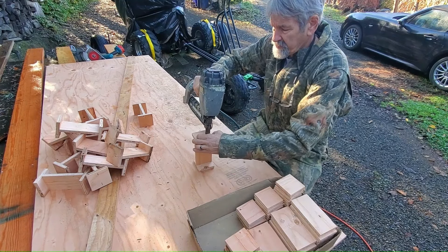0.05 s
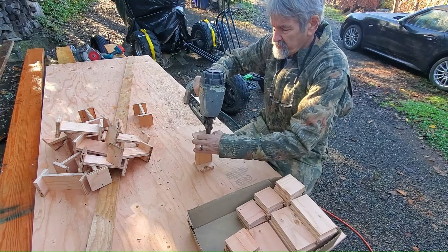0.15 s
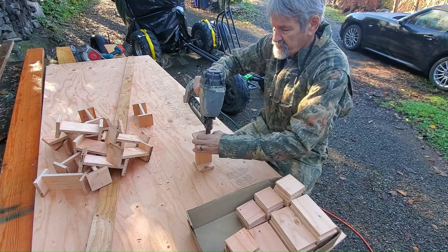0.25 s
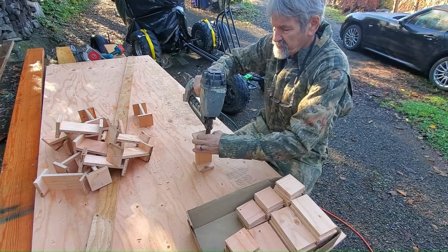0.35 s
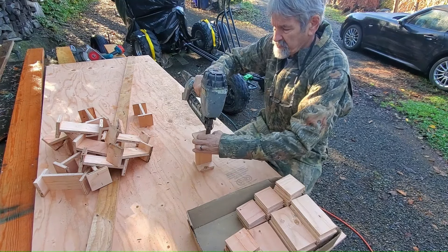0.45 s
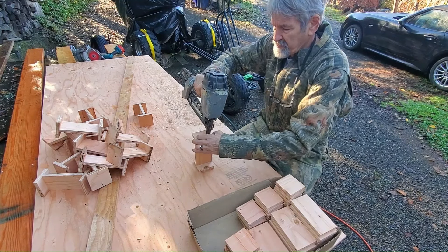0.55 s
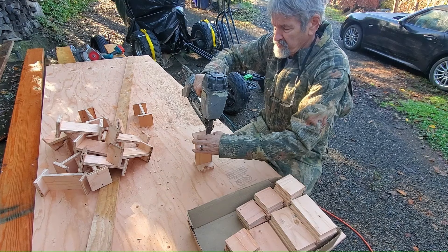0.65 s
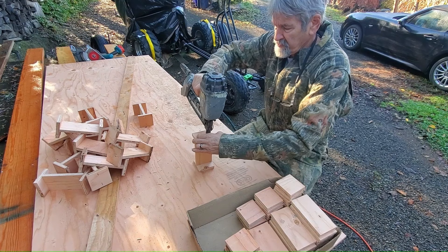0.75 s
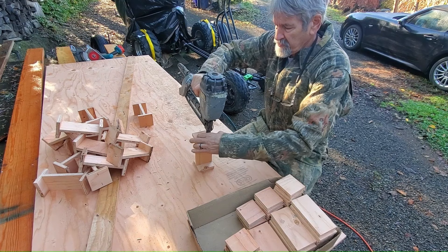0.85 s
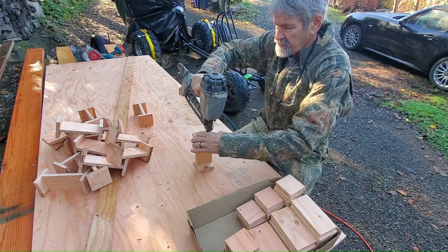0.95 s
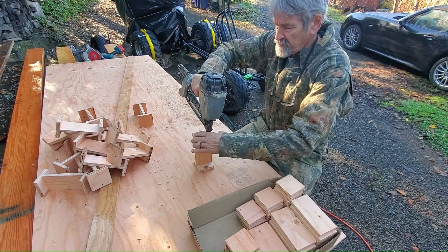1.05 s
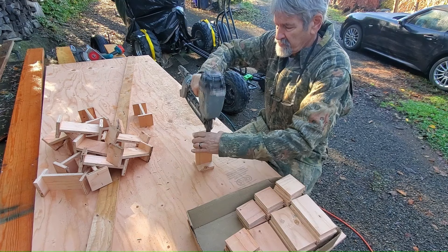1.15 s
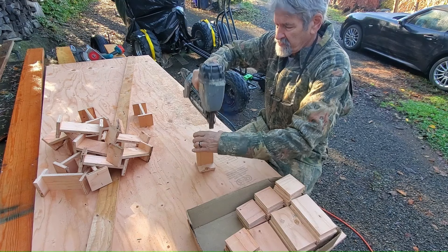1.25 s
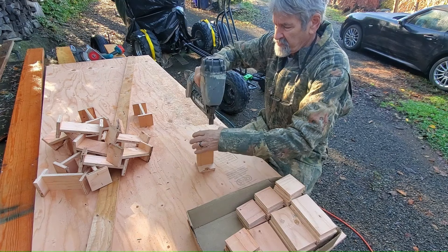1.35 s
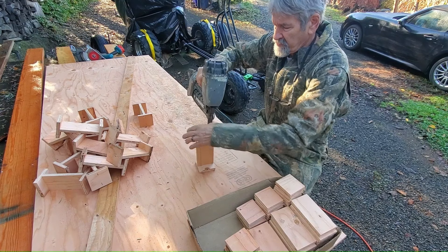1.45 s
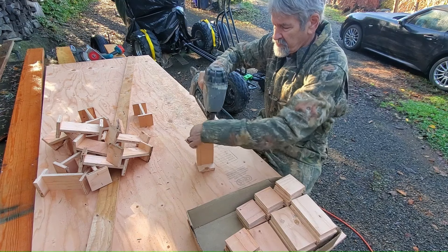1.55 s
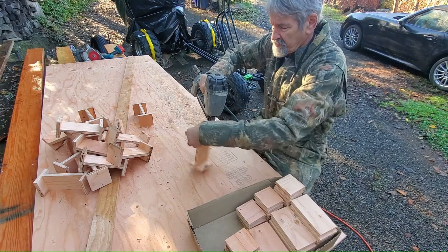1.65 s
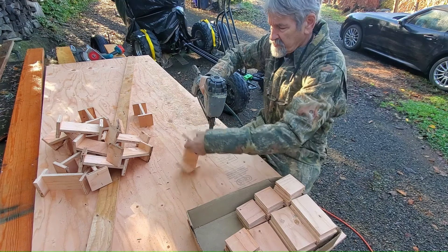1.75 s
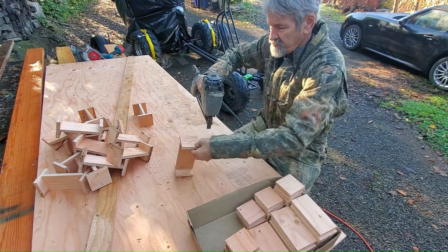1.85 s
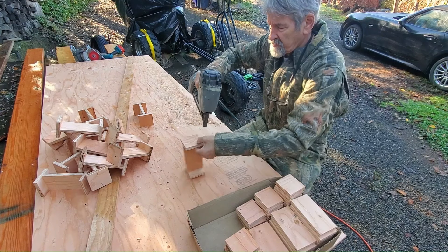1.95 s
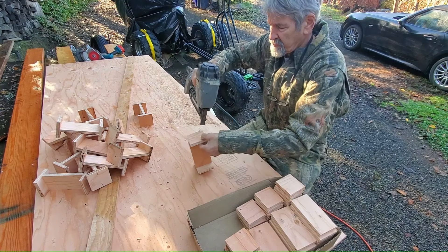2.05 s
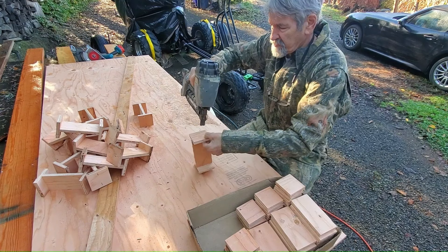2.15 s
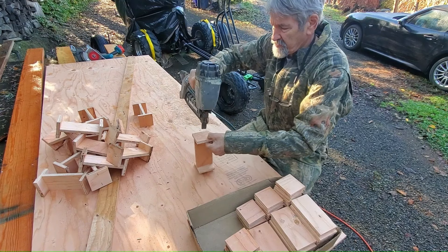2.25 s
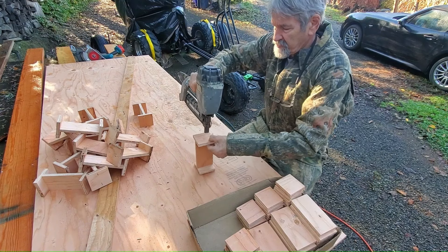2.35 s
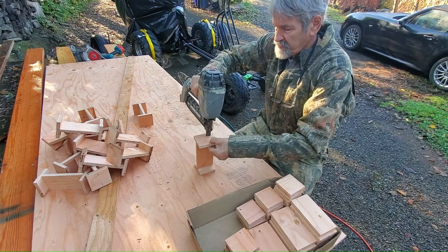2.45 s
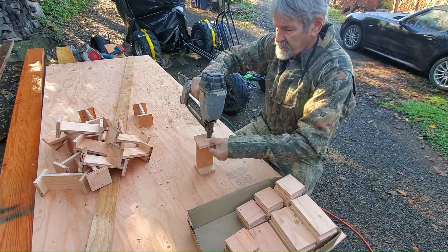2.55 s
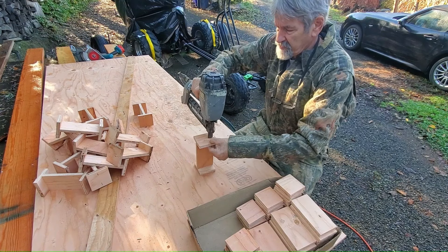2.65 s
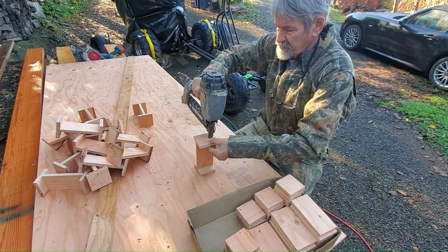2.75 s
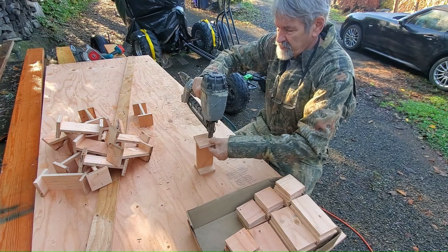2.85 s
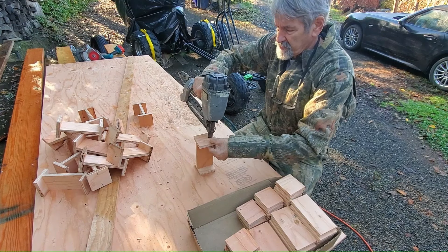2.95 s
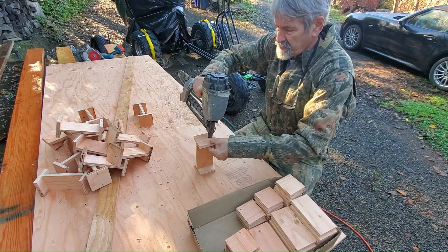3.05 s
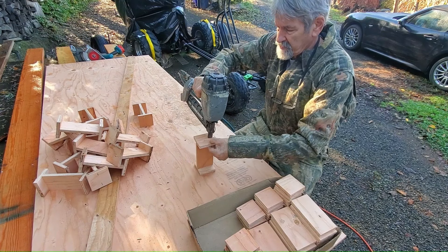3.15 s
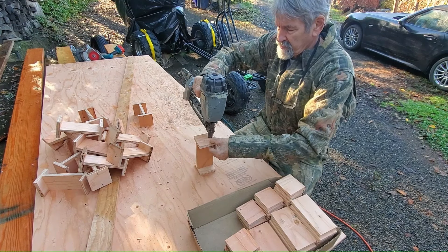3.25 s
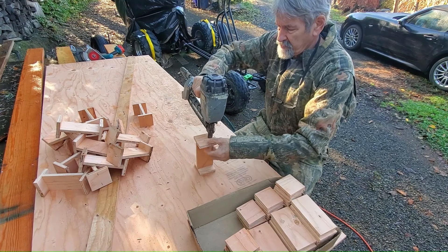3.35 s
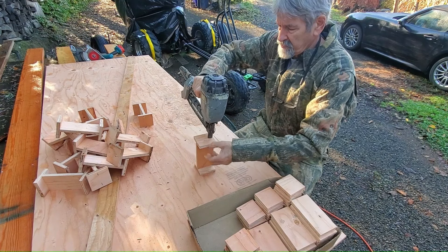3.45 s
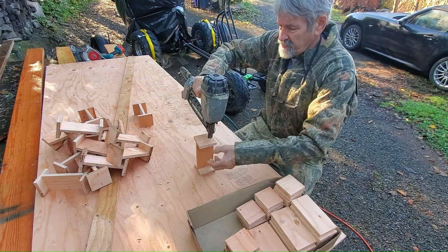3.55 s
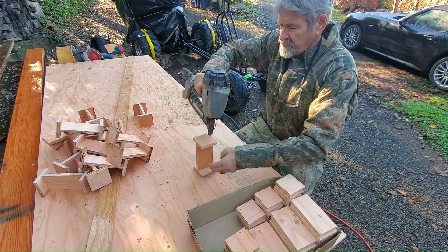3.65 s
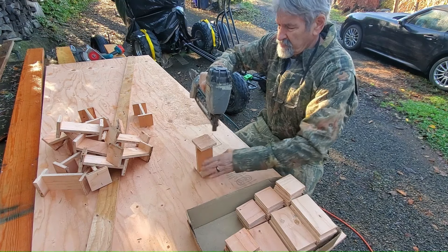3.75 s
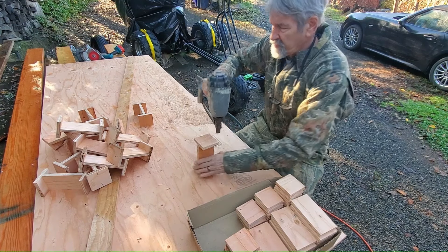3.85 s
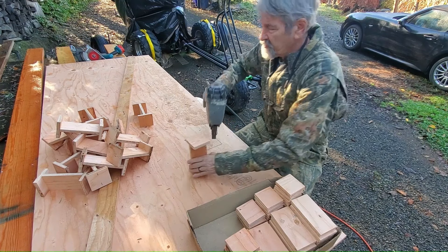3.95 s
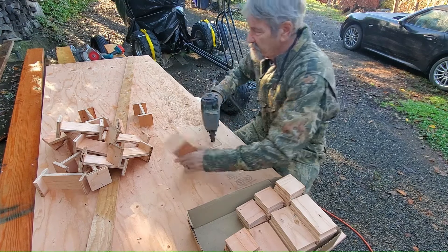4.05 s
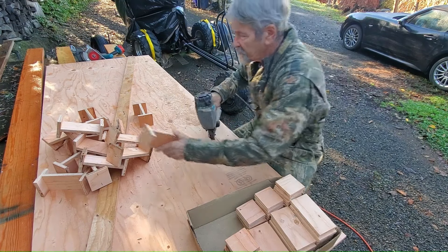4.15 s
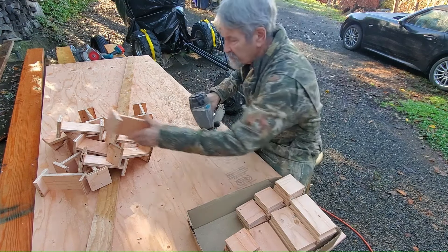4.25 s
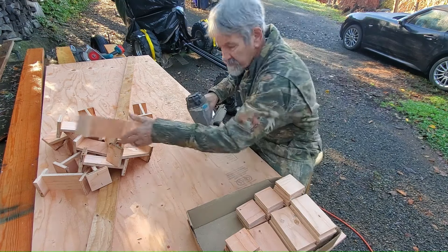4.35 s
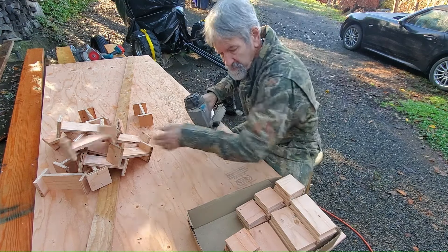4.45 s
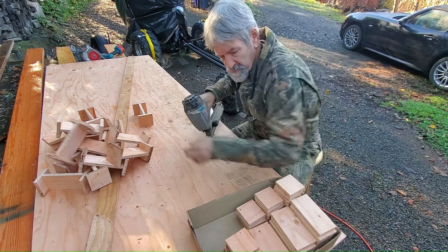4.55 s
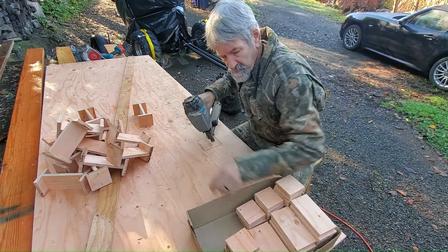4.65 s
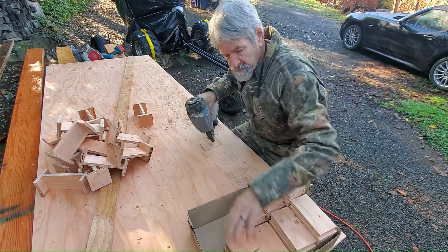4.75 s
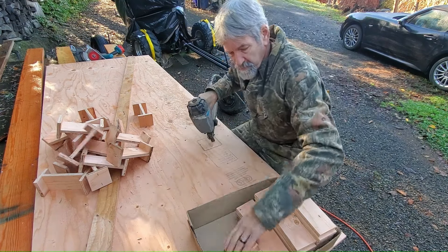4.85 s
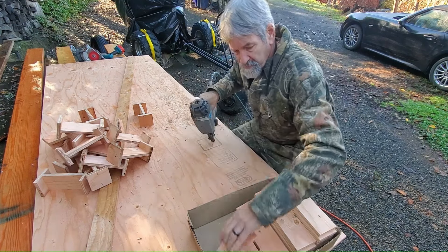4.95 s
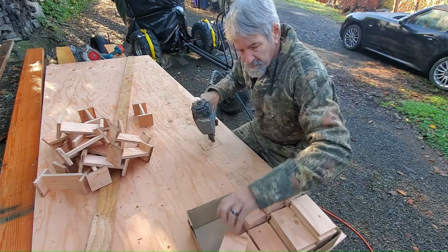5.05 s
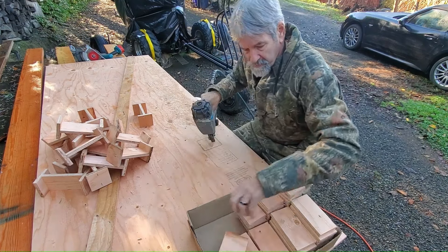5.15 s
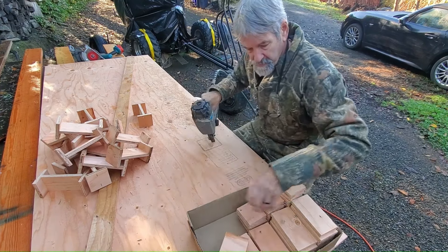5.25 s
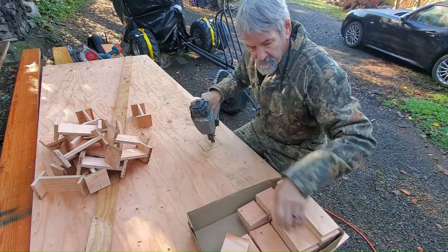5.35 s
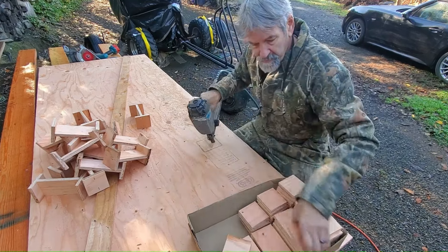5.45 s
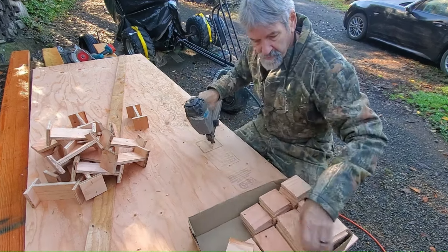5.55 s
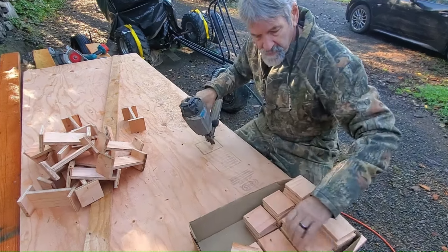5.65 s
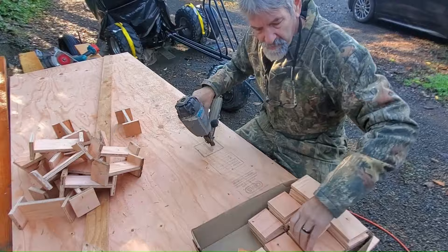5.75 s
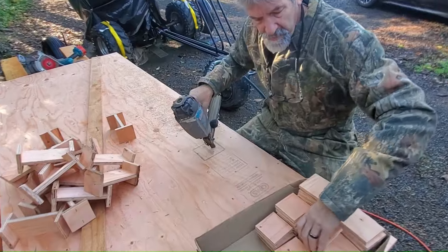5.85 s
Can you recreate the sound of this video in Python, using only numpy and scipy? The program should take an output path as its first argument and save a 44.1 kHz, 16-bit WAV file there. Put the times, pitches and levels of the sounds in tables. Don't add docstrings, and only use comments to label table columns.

```python
import sys
import numpy as np
from scipy import signal
from scipy.fft import rfft, irfft, next_fast_len
from scipy.io import wavfile
from scipy.ndimage import uniform_filter1d, map_coordinates

SR = 44100
rng = np.random.default_rng(int(sys.argv[2]) if len(sys.argv) > 2 else 0)


def field_ratio(decibels):
    return 10 ** (np.asarray(decibels, dtype=float) / 20)


def store_wav(level_fs):
    pcm = np.round(np.clip(np.atleast_2d(level_fs), -1, 1) * 32767)
    wavfile.write(sys.argv[1], SR, pcm.T.astype(np.int16))


N = 260322
GAIN_OPENS_S = 4.883

# trigger_s, landing_s (of the driver), release_s, air_db, wood_db
SHOTS = [
    (1.21, 1.262, 1.3375, 0.64, 0.5),
    (3.641, 3.678, 3.797, 0.28, 0),
]
# frequency_hz, density_db (per Hz)
LEAVES = [(1290, -42.5), (2200, -22), (2710, -4), (2890, -3), (3840, -0.5), (4530, -3.5), (5440, 1.5),
          (6800, -1.5), (7520, -11), (16000, -16.5)]
# frequency_hz, left_right_likeness (0 to 1)
NEAR_ALIKE = [(100, .94), (300, .86), (600, .7), (1000, .45), (5000, .5), (15000, .62)]


def unit(x):
    return x / np.sqrt(np.mean(x ** 2) + 1e-20)


def along(points, hz):
    f, v = np.transpose(points)
    return np.interp(np.log(hz + 1), np.log(f + 1), v)


def shaped(points):
    return lambda hz: field_ratio(along(points, hz))


def wobble(rate):
    return map_coordinates(rng.standard_normal(int(N * rate / SR) + 4), [np.arange(N) * rate / SR])


def filtered(x, response):
    m = next_fast_len(N + 8192)
    return irfft(rfft(x, m) * response(np.fft.rfftfreq(m, 1 / SR)), m)[..., :N]


def spread(pair, alike, lead):
    def mid_side(hz):
        turn = np.arccos(np.clip(along(alike, hz), -1, 1)) / 2
        return np.array([np.cos(turn), np.sin(turn)])

    mid, side = filtered(pair, mid_side)
    left_right = np.array([mid + side, mid - side])
    return filtered(left_right, lambda hz: np.exp(.5j * along(lead, hz) * np.array([[1], [-1]])))


def rush(colour, patchy_db):
    z = signal.stft(rng.standard_normal((2, N)), nperseg=512)[2]
    field = uniform_filter1d(rng.standard_normal(z.shape[1:]), size=6, axis=0)
    field = uniform_filter1d(field, size=8, axis=1)
    pair = signal.istft(z * field_ratio(patchy_db * unit(field)), nperseg=512)[1][:, :N]
    return unit(filtered(pair, colour))


def dying(t60_points, stretch, colour):
    hz, t, z = signal.stft(rng.standard_normal((2, SR // 2)), SR, nperseg=128)
    t60 = stretch * along(t60_points, hz)[:, None]
    z = z * colour(hz)[:, None] * field_ratio(-60 * t / t60)
    return signal.istft(z, SR, nperseg=128)[1][:, :SR // 2]


def strokes():
    # start_s, hold_s, body_db, top_db
    rubs = [(0.747, 0.087, -45, -53.5), (4.896, 0.15, -58, -66), (5.416, 0.026, -55.5, -68.5),
            (5.479, .014, -52, -73), (5.513, .022, -51, -76), (5.593, 0.025, -60, -60.5),
            (5.701, 0.027, -57, -65.5), (5.832, .1, -56, -69.5)]
    t = np.arange(N) / SR
    s, hold, body_db, top_db = np.transpose(rubs)[:, :, None]
    rise_db = 414 * np.minimum(t - s, 0)
    fade_db = 11 * np.maximum((t - s) / hold - 1, 0)
    heard = (s < GAIN_OPENS_S) | (t > GAIN_OPENS_S)
    body = heard * field_ratio(body_db + rise_db - fade_db)
    top = heard * field_ratio(top_db + rise_db - 1.75 * fade_db)
    return body.sum(axis=0), top.sum(axis=0)


def yard():
    # time_s, gain_db
    ducking = [(0, -0.5), (.66, 0.5), (1.2, 1), (1.4, -20), (1.7, -27), (2.4, -30), (2.61, -27.5),
               (2.63, -18), (2.73, -17), (2.75, -10.5), (2.92, -8.5), (3.2, -6), (3.62, -1.5), (3.9, -19),
               (4.12, -23), (4.4, -29), (4.87, -29.5)]
    full_db, open_db = (-45, -50, -70.5), (-44, -49.5, -65.5)
    # frequency_hz, density_db (per Hz)
    rumble_colour, road_colour, road_open = [(15, -47.5), (25, -8), (47, 2), (65, 2), (125, -3.5),
                                             (183, -15.5), (260, -23.5), (340, -50), (570, -120)], [(120, -30), (200, -3.5), (253, -11), (349, -2),
                                                             (406, -5.5), (733, 4), (1100, -1), (1500, -13),
                                                             (2140, -20.5), (2600, -32), (3380, -60.5),
                                                             (5720, -120)], [(120, -29.5), (200, -6),
                                                                           (248, -10.5), (321, 0),
                                                                           (406, -9.5), (665, -7.5),
                                                                           (1250, -12.5), (2600, -36),
                                                                           (3380, -62), (5720, -120)]
    leaves_open = [(1290, -33), (2200, -15), (3170, -13), (3590, -4.5), (4200, -4.5), (4720, -10.5),
                   (6310, -8.5), (7970, -20), (12400, -20.5), (16000, -21.5)]
    chirps = (.5, 1.03, 3.1, 3.45)
    # frequency_hz, left_right_likeness (-1 to 1)
    far_alike = [(60, 0.86), (180, 0.9), (550, -0.28), (1650, -0.72), (4970, 0.01), (15000, 0.05)]

    t = np.arange(N) / SR
    after = t > GAIN_OPENS_S
    ducked_db = np.array(full_db)[:, None] + np.interp(t, *np.transpose(ducking))
    rumble_db, road_db, leaf_db = np.where(after, np.array(open_db)[:, None], ducked_db)

    rumble = field_ratio(rumble_db + 2.6 * wobble(17)) * rush(shaped(rumble_colour), patchy_db=1.0)

    road = np.where(after, rush(shaped(road_open), patchy_db=3.0), rush(shaped(road_colour), patchy_db=0.5))
    road = field_ratio(road_db + 2.1 * wobble(9)) * road

    card = after * field_ratio(-16) * strokes()[0]
    leaves = np.where(after, rush(shaped(leaves_open), patchy_db=2.5), rush(shaped(LEAVES), patchy_db=1.0))
    leaves = (field_ratio(leaf_db) + card) * field_ratio(.8 * wobble(9)) * leaves

    swell_db = 10 * sum(np.exp(-((t - s) / 0.1) ** 2) for s in chirps)
    tone = lambda hz: 1 / (1 + ((hz - 2650) / 35) ** 2) + .3 / (1 + ((hz - 5250) / 200) ** 2)
    whistle = field_ratio(leaf_db - 9.5 + 1.2 * wobble(4.4) + swell_db) * rush(tone, patchy_db=2.5)
    whistle = whistle * (t < 3.64)
    return spread(rumble + road + leaves + whistle, far_alike, [(100, 0.0016)])


def trees(x):
    tail = dying([(100, 0.65)], 0.99, shaped(LEAVES))
    return signal.fftconvolve(x[None], tail / np.linalg.norm(tail[0]), axes=1)[:, :N]


def walls(x):
    # frequency_hz, t60_s
    wall_t60 = [(100, 0.76), (1000, 0.24), (3000, 0.22), (6000, .12), (12000, 0.025)]
    tail = dying(wall_t60, 0.85, np.ones_like)
    return signal.fftconvolve(np.pad(x, (500, 0))[None], tail / np.linalg.norm(tail[0]), axes=1)[:, :N]


def hands():
    # frequency_hz, density_db (per Hz)
    rub_body, rub_top = [(220, -39), (330, 3.5), (600, 2), (1500, -5.5), (2800, -10), (4200, -10),
                         (6500, -15.5), (8000, -70)], [(5200, -45), (6900, 0), (11000, 0), (14000, 3.5), (15800, -5),
                                           (16200, -58.5)]
    # frequency_hz, width_hz, level_db
    slide_peaks = [(503, 120, -0.5), (1120, 130, -3.5), (1600, 110, 2), (2110, 130, 0.5), (2780, 140, -2.5),
                   (3320, 56, -18), (3740, 53, -15), (3800, 55, -14.5)]

    body, top = strokes()
    rub = body * rush(shaped(rub_body), patchy_db=0.8) + top * rush(shaped(rub_top), patchy_db=3.5)

    block = lambda f: sum(field_ratio(db) / (1 + ((f - c) / w) ** 2) for c, w, db in slide_peaks)
    u = np.clip(np.arange(N) / SR - 5.793, 0, 1)
    grip = np.minimum(u / 0.01, 1) * field_ratio(-50 + 48 * u + 2.1 * wobble(90))
    slide = grip * rush(block, patchy_db=.5)
    return spread(field_ratio(2.5 * wobble(120)) * rub + slide, NEAR_ALIKE, [(100, 0.008)])


def ticks():
    # time_s, peak_db, pitch_hz,
    # t60_s
    small_rings = [(3.477, -53, 5600, 0.01), (3.477, -56, 13000, .008), (3.46, -58, 900, .02),
                   (3.478, -60.5, 2300, .015), (3.479, -59.5, 9500, 0.008), (2.622, -46, 70, .25),
                   (2.743, -42.5, 72.84, 0.12), (2.778, -36, 78, .18), (2.8, -41.5, 62, .2),
                   (3.298, -38.5, 73, 0.25), (4.432, -75, 3550, 0.12), (4.43, -75, 1480, 0.15),
                   (3.7, -42, 1130, 0.025), (4.513, -41.5, 1430, 0.03), (4.513, -35, 370, .06),
                   (4.513, -38, 557, 0.043), (4.513, -50, 3300, 0.03), (4.513, -50, 3600, 0.03),
                   (4.157, -32, 260, .12), (3.7705, -17, 290, .03), (3.7715, -23, 620, .025),
                   (1.527, -52, 2300, .012), (4.157, -36, 400, .1), (4.157, -38, 328, .12),
                   (4.157, -22, 97, .13), (4.232, -30.5, 95, .2), (4.612, -27, 100, .08),
                   (4.2, -33.5, 384, 0.06), (5, -41, 3900, 0.023), (5.027, -46.5, 1600, 0.025),
                   (5.478, -51, 2240, 0.02), (6.2, -47, 2046, 0.03), (5.688, -43, 900, 0.076),
                   (4.6, -42.5, 514, 0.043), (1.93, -60, 920, 0.035), (1.477, -45, 2600, 0.076),
                   (1.364, -15.5, 3200, .012), (1.2675, -9, 3320, 0.0073), (3.823, -23, 4500, 0.011),
                   (3.8, -32.5, 1522, 0.013),
                   (.22, -59, 3800, 0.035), (.33, -55, 6500, 0.027), (.332, -59, 5350, .025),
                   (3.892, -36.5, 442, 0.041), (1.527, -48.5, 1490, 0.01), (1.595, -61, 700, .02),
                   (1.93, -78, 2600, .02), (2.071, -74, 2800, 0.022), (2.164, -78, 3300, .015),
                   (2.66, -79, 7650, .6), (2.74, -80, 7550, .3), (3.44, -64, 4000, 0.044),
                   (3.46, -59, 7000, 0.024), (3.52, -61, 5200, .05), (4.012, -55, 4380, .05),
                   (4.44, -77.5, 6510, 0.083), (4.445, -78, 2900, .06), (4.53, -72, 3350, .12),
                   (5.03, -53, 4200, .2), (5.07, -53, 4450, .1), (5.12, -59, 4160, .4),
                   (5.24, -61.5, 3700, .1), (5.52, -52, 3100, .06), (5.51, -50, 1600, 0.05),
                   (5.515, -50, 2300, .04), (5.48, -52, 4200, .04), (5.7, -54, 4150, .08)]

    out, t = np.zeros((2, N + SR)), np.arange(SR // 8) / SR
    for s, db, hz, t60 in small_rings:
        smooth = lambda x: uniform_filter1d(x, size=round(2 * SR / hz))
        rough = 1 + 0.5 * unit(smooth(smooth(rng.standard_normal((2, len(t))))))
        ring = field_ratio(db - 60 * t / t60) * np.sin(2 * np.pi * hz * t) * rough
        onset = (1 - np.exp(-t * hz * 2.2)) ** 2
        out[:, round(s * SR):][:, :len(t)] += ring * onset * np.cos(4 * np.pi * t)
    return out[:, :N]


def struck(blows, modes, level_db, rattle_db):
    # frequency_hz, t60_s; then frequency_hz, density_db (per Hz)
    wood_t60, wood_rattle = [(100, 1), (500, 0.2), (1500, 0.21), (4000, 0.042), (10000, 0.065)], [(60, -32), (150, 0.5), (500, -2.5), (1200, -6),
                                               (2500, -14.5), (6000, -25), (15000, -26.5)]

    out, t = np.zeros((2, N + SR)), np.arange(SR // 2) / SR
    hz, mode_db, t60 = np.transpose(modes)[:, :, None]
    quarter = [[[0]], [[np.pi / 2]]]
    peak = lambda x: x / np.abs(x[0]).max()
    for s, db, crack_db, soft_ms, ring in blows:
        chance = rng.standard_normal((4, len(modes), 1))
        contact = lambda f: 1 / (1 + (f * soft_ms / 400) ** 2)
        wave = np.sin(2 * np.pi * hz * (1 + 0.013 * chance[2:]) * t + quarter)
        decay = field_ratio(mode_db + 1.0 * chance[:2] - 60 * t / (t60 * ring))
        body = np.sum(decay * contact(hz) * wave, axis=1)
        rattle = dying(wood_t60, ring, lambda f: field_ratio(along(wood_rattle, f)) * contact(f * .3) ** 2)
        crack = dying([(100, .007)], 1, lambda f: contact(f * .08))
        blow = peak(body) + field_ratio(rattle_db) * peak(rattle) + field_ratio(crack_db) * peak(crack)
        onset = 1 - np.exp(-t * 1000 / (soft_ms * .6))
        out[:, round(s * SR):][:, :len(t)] -= field_ratio(db + level_db) * blow * onset
    return filtered(out[:, :N], lambda f: (1j * f / (45 + 1j * f)) ** 2)


def tossed_blocks():
    # time_s, peak_db, crack_db, softness_ms, ring_share (of t60)
    tumbles = [(4.156, -28, -29.5, 0.14, 1.1), (4.176, -44, -20, 0.1, .4), (4.19, -39.5, -18.5, .12, 0.43),
               (4.216, -50, -24, .2, .4), (4.275, -61, -24, .25, .4), (4.513, -46, -60, 1.6, 0.66),
               (4.529, -47, -45, 1.2, 0.65), (4.587, -38, -60, 1.8, 0.4), (4.602, -22, -27, 0.2, 0.75),
               (4.62, -24, -47, 0.3, 0.5), (4.675, -44, -46.5, 0.7, 0.42), (4.695, -50, -38.5, 0.28, 0.3),
               (4.745, -58, -33, .4, 0.74), (4.995, -31, -16, 1.13, 0.29), (5.795, -36, -35, 0.44, 0.45)]
    # pitch_hz, level_db, t60_s
    block_modes = [(95.8, -2, 0.24), (147.2, -1.5, 0.24), (338, -7.5, 0.089), (478, 4, 0.15),
                   (527, -2.5, 0.21), (822, -14, 0.076), (1117, -3, 0.1), (1450, -9.5, 0.044),
                   (2120, -28, .04), (3280, -1.5, 0.043)]
    return struck(tumbles, block_modes, level_db=1.5, rattle_db=-5.0)


def soft_knocks():
    # time_s, peak_db, softness_ms, ring_share (of t60)
    singles = [(1.702, -56.5, 1.4, 0.86), (2.742, -44.5, 1.5, 0.72), (2.84, -50, 3, 0.34),
               (4.156, -29.5, 0.44, 0.6), (4.228, -39.5, 2.8, .74), (4.6, -44.5, 1.3, 0.75),
               (5.696, -30.5, 1.3, .55)]
    # time_s, peak_db, softness_ms, ring_share (of t60)
    set_downs = [(1.930, -43, 0.88, 0.55), (2.073, -46, 1.26, .37), (2.163, -44.5, 2, 0.45),
                 (2.62, -49.5, 1.8, 0.94), (3.993, -40.5, 0.81, 0.57)]
    # pitch_hz, level_db, t60_s
    thud_modes = [(66, -7.5, 0.076), (94, 3.5, 0.23), (108.9, -4.5, 0.37), (148.7, 0.5, .21),
                  (174, 0, 0.19), (284.4, -3, 0.2), (326.6, 2.5, 0.16), (400.3, -23, 0.12), (700, -6, 0.06),
                  (824, 0, .07), (1230, -23.5, .06)]

    rocks = [(s + .034, db - 5, soft * 1.5, ring * 0.73) for s, db, soft, ring in set_downs]
    blows = []
    for s, db, soft_ms, ring in sorted(singles + set_downs + rocks):
        crack_db = -60 + 20 / soft_ms
        blows.append((s, db, crack_db, soft_ms, ring))
    return struck(blows, thud_modes, level_db=7.5, rattle_db=-25)


def slams():
    # delay_s, peak_db, crack_db, softness_ms, ring_share (of t60)
    landing_blows = [
        (.0005, -12, -9, .5, .9),
        (.0052, -5, -1, .15, .6),
        (.016, -17, -20, .3, .5),
        (.031, -13.5, -21, .5, .7),
    ]
    return_blows = [
        (.0012, -18, -7, .3, .65),
        (.025, -13.5, -6.5, .2, .4),
    ]
    # time_s, then the same columns
    recoil = [(3.770, -13.5, -35, .8, .17)]
    # pitch_hz, level_db, t60_s
    table_modes = [(62, -10.5, 0.064), (94, -2.5, .24), (124, -2.5, 0.23), (148, -1.5, 0.29),
                   (169.7, 0, 0.3), (213, -2.5, .14), (325, 2, 0.17), (352, 2.5, 0.22), (401, 1, 0.18),
                   (487, -5, 0.14), (587, -1, 0.23), (760, -14, .08), (1026, -2, 0.12), (1200, -8, .07),
                   (2070, -10, .07)]

    blows = list(recoil)
    for _, landing, release, _, wood_db in SHOTS:
        for delay, db, *rest in landing_blows:
            blows.append((landing + delay, db + wood_db, *rest))
        freed = (release - landing) / .095
        for delay, db, crack_db, soft_ms, ring in return_blows:
            blows.append((release + delay, db + 1.8 * wood_db, crack_db, soft_ms, ring * freed))
    return struck(sorted(blows), table_modes, level_db=-0.5, rattle_db=-7.5)


def air():
    # frequency_hz, density_db (per Hz)
    valve_colour, exhaust_colour = [(290, -53.5), (500, -24.5), (2460, -19), (3400, -10.5), (4490, -9.5),
                                    (6760, -8), (8420, -12.5), (12300, -3.5), (14900, -5), (15800, -9.5),
                                    (16500, -29.5)], [(290, -31), (500, -5), (787, -9.5), (1480, -2.5),
                                                       (1610, -5), (3210, -4.5), (6760, -7.5),
                                                       (8000, -10.5), (15100, -6), (15800, -13),
                                                       (16500, -32)]
    # delay_s (after landing), rise_s, t60_s, bend (of the decay)
    blast, flow = (0, 0.0015, .0145, 3), (.008, 0.0033, 0.36, 1.2)
    # delay_s (after release), level_db, rise_s, t60_s, bend
    last_delay, last_db, *last_shape = (0.0146, -30, 0.0144, .27, 1.35)

    t = np.arange(N) / SR
    swell = lambda u, rise: np.clip(u / rise, 0, 1) ** 2

    def burst(u, db, rise, t60, bend):
        return swell(u, rise) * field_ratio(db - 60 * (np.clip(u - rise, 0, 2) / t60) ** bend)

    valve, exhaust = 0, 0
    hiss = rush(shaped(valve_colour), patchy_db=2.0)
    low = filtered(hiss, lambda hz: 1 / (1 + (hz / 9000) ** 4))
    for trigger, landing, release, air_db, wood_db in SHOTS:
        travel = landing - trigger
        late_ms = 1000 * travel - 44.7
        u = (t - trigger) / travel
        tilt = field_ratio(0.1 * late_ms / 2)
        valve_gain = swell(u, 0.22) * field_ratio(-14 - 60 * np.clip(u - .78, 0, 20) / .75)
        valve = valve + (low / tilt + (hiss - low) * tilt) * valve_gain

        blast_db = -2.5 - 0.2654 * 1000 * travel
        for db, (delay, *shape) in [(blast_db, blast), (-29.5 + wood_db, flow)]:
            exhaust = exhaust + burst(t - landing - delay, db, *shape)
        exhaust = exhaust + burst(t - release, -13 + air_db, 0.0015, 1.15 * travel, bend=1.6)
        exhaust = exhaust + burst(t - release - last_delay, last_db - .15 * late_ms, *last_shape)

    jet = rush(shaped(exhaust_colour), patchy_db=0.2)
    dull = filtered(jet, lambda hz: 1 / (1 + (hz / 7500) ** 4))
    bright = field_ratio(4.0) * exhaust ** 1.027 * (jet - dull)
    return field_ratio(1.9 * wobble(500)) * (valve + exhaust * dull + bright)


def scene():
    # frequency_hz, left_lead_rad
    near_lead = [(300, 0), (600, .3), (1400, 1.3), (3000, 1.4), (4500, 1.7), (7500, 1.9), (10200, 2.8),
                 (11200, 2.7), (12800, 4.5), (16500, 6.2)]
    wood = slams() + soft_knocks() + tossed_blocks() + ticks()
    near = spread(air() + wood, NEAR_ALIKE, near_lead)
    echoes = field_ratio(-25.0) * walls(near[0]) + field_ratio(-33.5) * trees(near[0])
    return near + echoes + hands() + yard()


def roll_off(x):
    return signal.sosfilt(signal.butter(12, 17110, fs=SR, output="sos"), x)


def record(dry):
    # frequency_hz, gain_db
    mic_band = [(20, -12), (45, -3), (70, 0), (15900, 0), (16150, -26), (17100, -30)]
    held = dry / (1 + np.abs(dry / .86) ** 6) ** (1 / 6)
    hiss = field_ratio(-97) * rng.standard_normal(held.shape)
    return roll_off(filtered(held + hiss, shaped(mic_band)))


dry = scene()
out = record(dry)
store_wav(out)
```